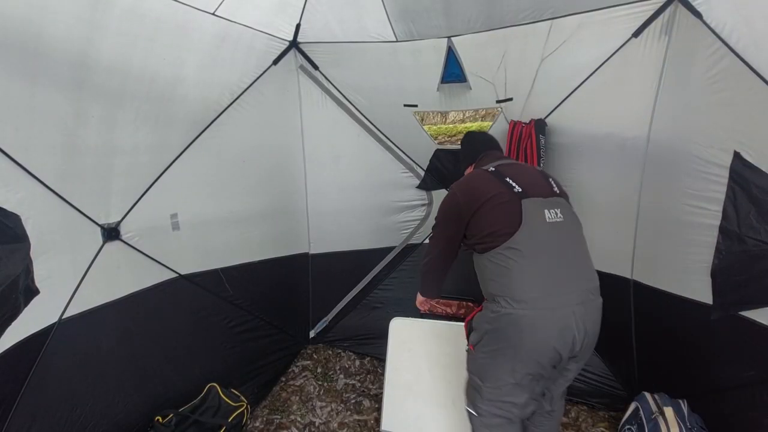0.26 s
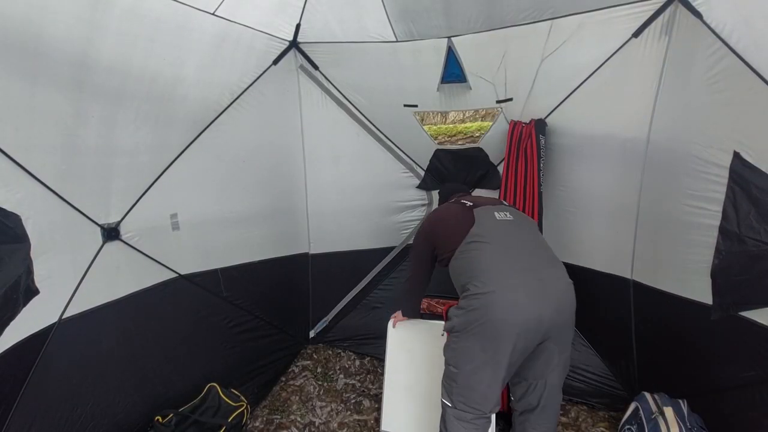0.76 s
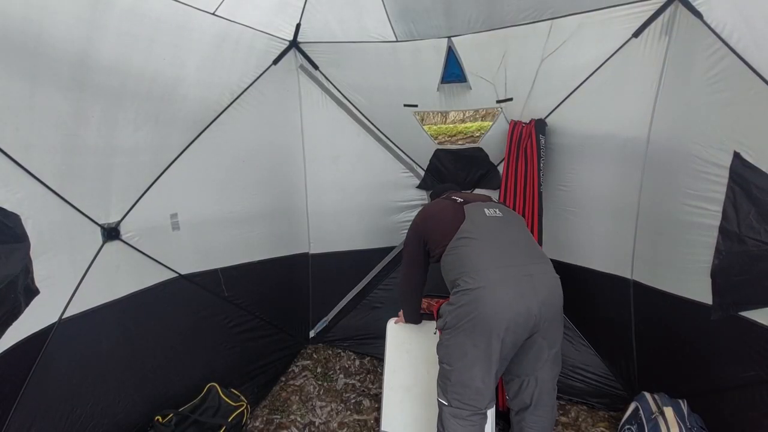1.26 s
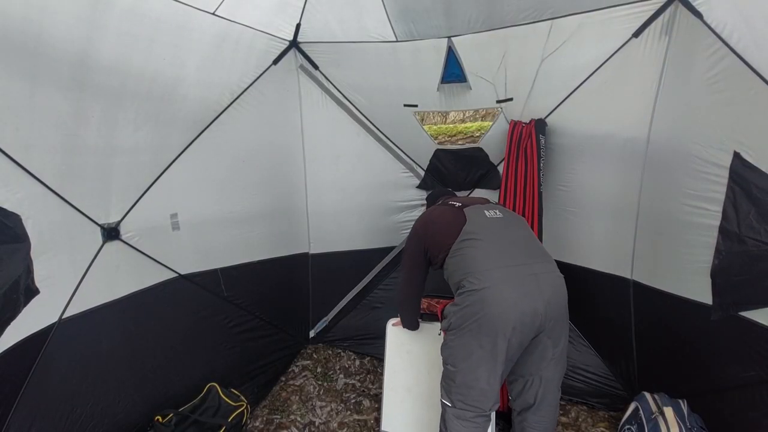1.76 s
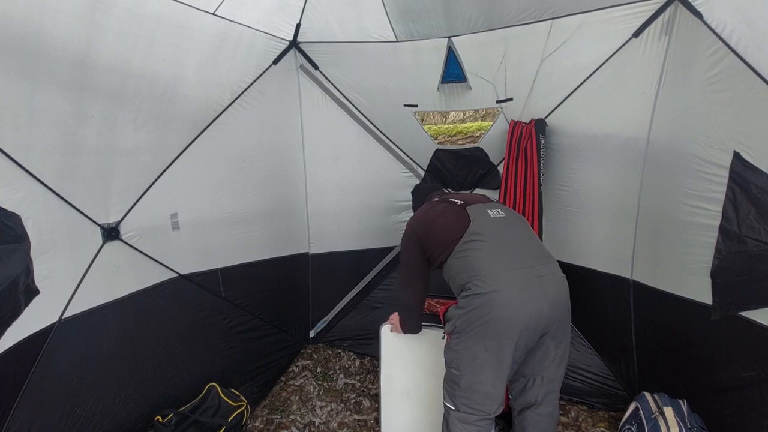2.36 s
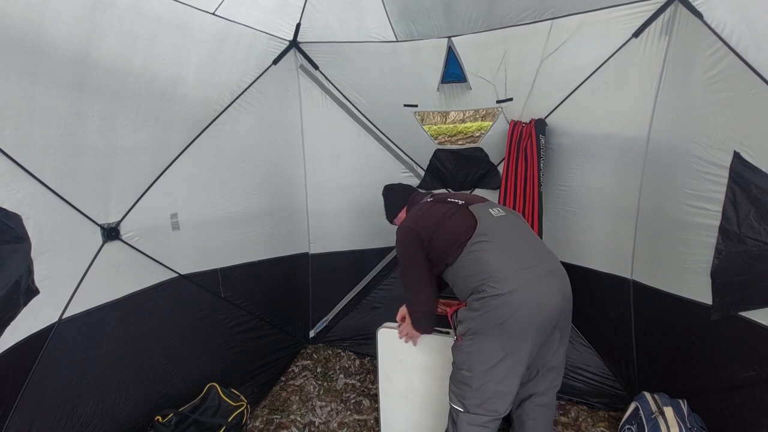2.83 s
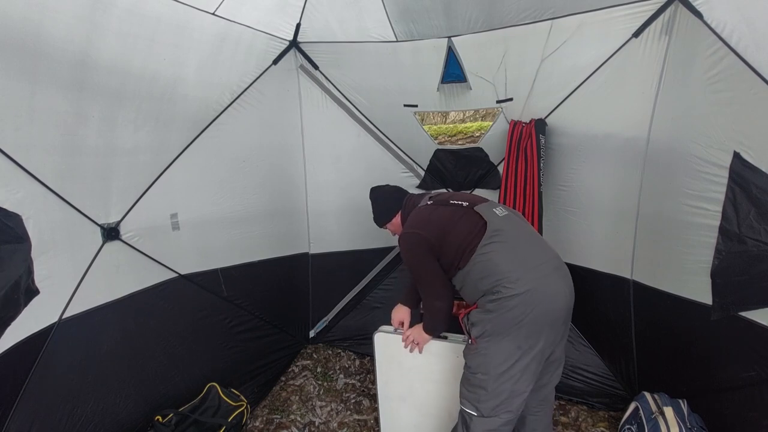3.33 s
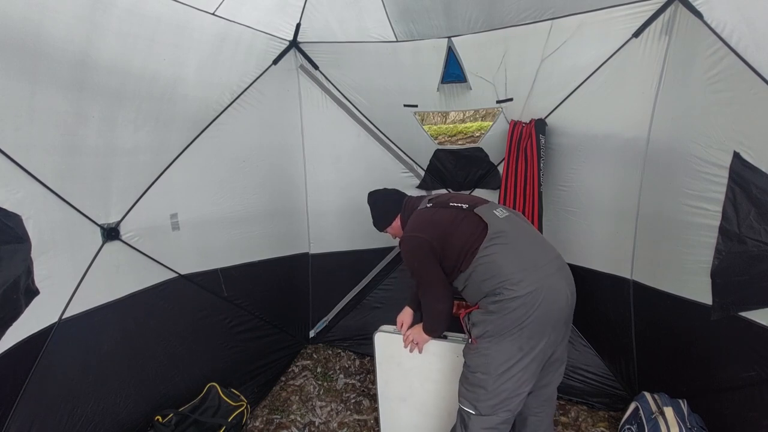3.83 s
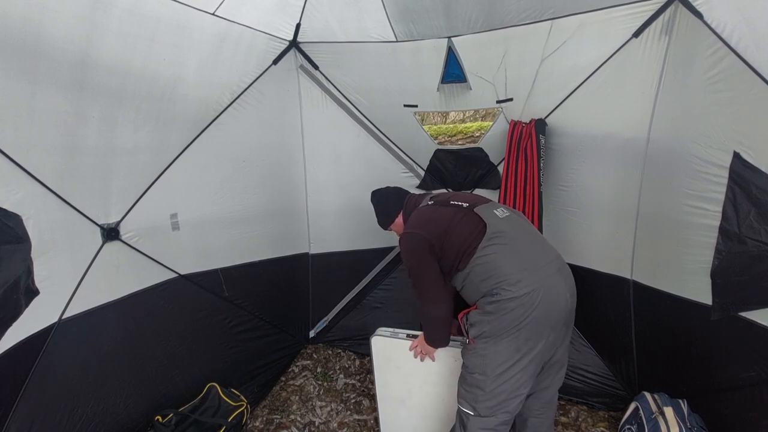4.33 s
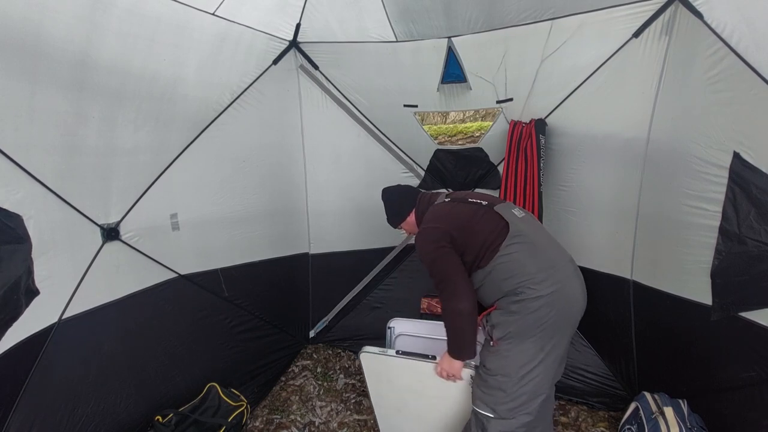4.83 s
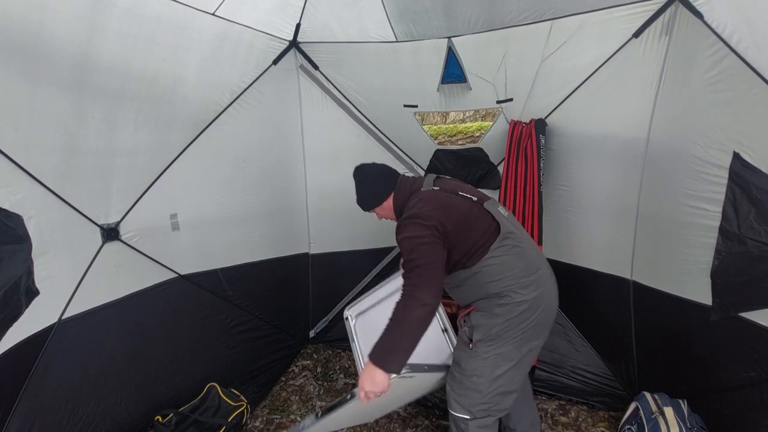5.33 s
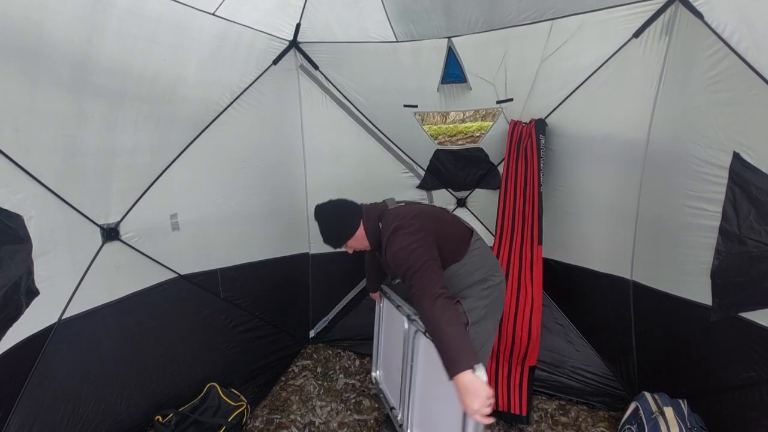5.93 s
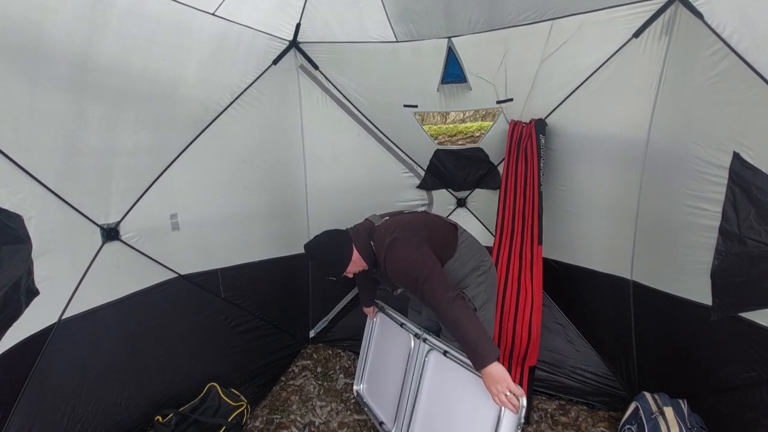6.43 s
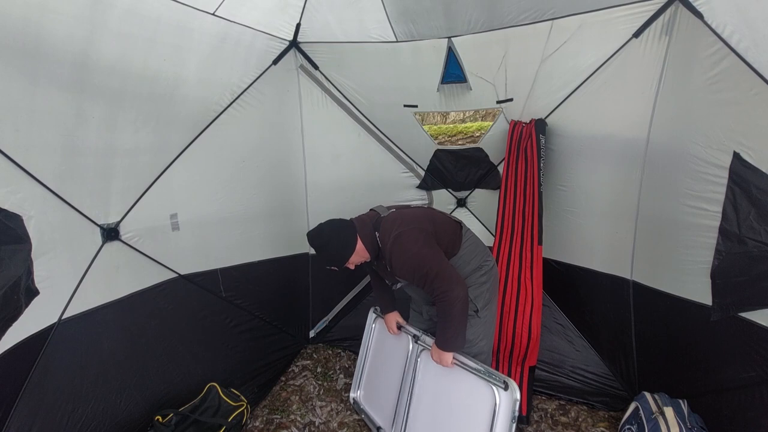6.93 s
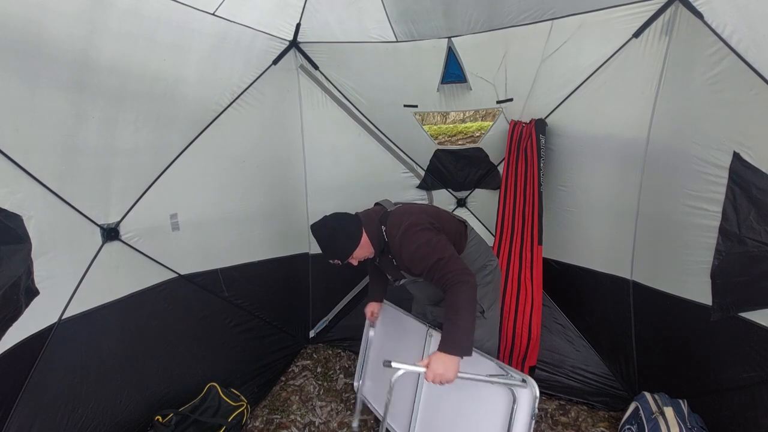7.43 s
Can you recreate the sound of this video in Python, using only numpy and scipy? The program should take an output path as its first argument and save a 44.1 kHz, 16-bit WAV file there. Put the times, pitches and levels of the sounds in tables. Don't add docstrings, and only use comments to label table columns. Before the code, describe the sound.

Stiff cloth and dry leaves rustle, then thin metal tubes clack and rattle over hollow thuds as a folding table is opened inside a tent.

```python
import sys
import numpy as np
from scipy import signal
from scipy.fft import rfft, irfft
from scipy.io import wavfile
from scipy.ndimage import uniform_filter1d

SR = 44100
rng = np.random.default_rng(int(sys.argv[2]) if len(sys.argv) > 2 else 0)


def volts_from_decibels(level):
    exponent = np.asarray(level, float) / 20
    return 10 ** exponent


def master_out(mix):
    frames = np.transpose(np.atleast_2d(mix))
    ceiling = np.clip(frames, -1, 1)
    pcm = np.round(ceiling * 32767).astype(np.int16)
    wavfile.write(sys.argv[1], SR, pcm)


N = 338688


def colour(x, table):
    hz, db = np.transpose(table)
    f = np.fft.rfftfreq(len(x), 1 / SR) + 1
    gain_db = np.interp(np.log(f), np.log(hz), db, left=-90, right=-90)
    y = irfft(rfft(x) * volts_from_decibels(gain_db), len(x))
    return y / np.sqrt(np.mean(y ** 2))


def band(x, lo_hz, hi_hz):
    sos = signal.butter(2, [lo_hz, min(hi_hz, 0.45 * SR)], "band", fs=SR, output="sos")
    return signal.sosfilt(sos, x)


def walk(rate_hz):
    hold = int(SR / rate_hz)
    steps = np.repeat(rng.standard_normal(N // hold + 1), hold)
    return 0.622 * uniform_filter1d(uniform_filter1d(steps, hold), hold)[:N]


def grit(spread_db, size=N):
    strength = np.minimum(rng.exponential(size=size), 3.5)
    return rng.standard_normal(size) * volts_from_decibels(spread_db * strength)


def decay(t, t60):
    return 1000.0 ** (-t / t60)


def seconds(length_s):
    return np.arange(int(length_s * SR)) / SR


def add(out, s, x, db):
    i = max(int(s * SR), 0)
    x = x[:N - i]
    out[i:i + len(x)] += x * volts_from_decibels(db) / np.abs(x).max()


def ring(modes, gain_db, longest_s, t):
    hz, db, t60 = np.transpose(modes)[:, :, None]
    detune, phase, uneven = rng.standard_normal((3, len(modes), 1))
    wave = np.sin(2 * np.pi * (hz * (1 + 0.03 * detune) * t + phase))
    size = volts_from_decibels(db + gain_db + 2.5 * uneven)
    damped_t60 = np.minimum(0.13 * t60, longest_s)
    return np.sum(size * wave * decay(t, damped_t60), axis=0)


# pitch_hz, level_db per Hz
AIR_SPECTRUM = [(25, 2.5), (45, -22), (58, 1), (100, -4.5), (800, -15), (1000, -46), (2000, -60),
                (4300, -42), (9000, -29.5), (12000, -33), (15800, -43)]


def air(spread_db, level_db):
    return volts_from_decibels(level_db) * colour(grit(spread_db), AIR_SPECTRUM)


def strokes(table, rest):
    s, db, rise_s, fall_s = np.transpose(table)[:, :, None]
    t = np.arange(0, N / SR + 0.001, 0.001)
    before = (s - t) / np.maximum(rise_s, 0.001)
    after = (t - s) / np.maximum(fall_s, 0.001)
    away = np.where(t < s, before, after)
    power = np.sum(volts_from_decibels(2 * (db - 10 * away)), axis=0)
    return np.sqrt(np.interp(np.arange(N) / SR, t, power) + rest ** 2)


def curves(table):
    s, *columns = np.transpose(table)
    return [volts_from_decibels(np.interp(np.arange(N) / SR, s, c)) for c in columns]


def patchy(x, table):
    x = colour(x, table)
    split_hz = table[len(table) // 2][0]
    dull = signal.sosfilt(signal.butter(1, split_hz, fs=SR, output="sos"), x)
    bright = x - dull
    return volts_from_decibels(1.5 * walk(25)) * dull + volts_from_decibels(1.5 * walk(25)) * bright


# peak_s, level_db, rise_s, fall_s
WALL_PUSHES = [(.08, -50.5, 0.33, .15), (.38, -51, 0.15, 0.18), (.66, -50, 0.091, 0.089),
               (1.47, -40.5, .03, 0.06), (3.31, -63, .06, 0.14), (3.68, -37, 0.042, 0.026),
               (4.0, -57, .04, 0.067), (4.19, -55, .05, 0.12), (5.07, -48.5, 0.22, 0.064),
               (5.56, -54.5, 0.074, 0.045), (5.97, -42.5, 0.029, 0.11), (6.2, -52, 0.18, 0.17),
               (6.4, -36.5, 0.11, 0.04), (6.99, -44.5, 0.21, 0.036), (7.51, -54, .06, 0.52)]


def wall_gain():
    return strokes(WALL_PUSHES, volts_from_decibels(-67.5))


def walls(push):
    wobble = 1 + 0.0728 * walk(10)
    drum = volts_from_decibels(-6.5) * np.sin(2 * np.pi * 54.6 * np.cumsum(wobble) / SR)
    flap = colour(grit(0.45), [(28, -41), (44, -23), (54, 5.5), (64, 3.5), (90, -5.5), (120, -2.5)])
    return push * (drum + 0.92 * flap)


def rumble(drag, push):
    gain = np.hypot(drag * volts_from_decibels(-15), push * volts_from_decibels(-7.5))
    shake = colour(grit(2.4), [(80, -38), (120, 3.5), (160, 11), (260, -1.5), (420, -5)])
    return gain * volts_from_decibels(8.4 * walk(30)) * shake


# peak_s, level_db, rise_s, fall_s
RUSTLES = [(.245, -47, 0.021, 0.046), (.31, -39.5, 0.059, 0.093), (.435, -39.5, 0.028, 0.066),
           (.596, -39.5, 0.023, 0.037), (.655, -47, 0.028, 0.028), (1.64, -56.5, 0.25, 0.096),
           (2.18, -63.5, 0.12, 0.71), (2.34, -56, 0.023, 0.11), (2.55, -61.5, 0.064, 0.039),
           (2.7, -59, 0.1, 0.1), (2.92, -57, 0.13, 0.062), (3.1, -57, .07, 0.054),
           (3.35, -59.5, 0.26, 0.39),
           (3.72, -54, .05, 0.019), (3.829, -53, 0.062, 0.046), (3.94, -50.5, 0.009, 0.044),
              (4.118, -41, 0.0053, 0.021), (4.7, -48, 0.12, 0.8), (4.974, -40, 0.036, 0.05),
              (5.012, -43, 0.069, 0.0067), (5.444, -47, 0.1, 0.28), (5.806, -42.5, 0.04, 0.076),
              (5.889, -44.5, 0.033, 0.042), (6.065, -26, 0.04, 0.063), (6.243, -34.5, 0.096, 0.042),
              (6.44, -47.5, 0.26, 0.021), (6.56, -45, 0.052, 0.11), (6.665, -42.5, 0.015, 0.046),
              (6.79, -47.5, 0.038, 0.078), (6.864, -39, .018, 0.071), (6.93, -41.5, 0.073, 0.099),
              (7.176, -42.5, 0.0052, 0.082), (7.23, -44.5, 0.0055, 0.081), (7.354, -39, 0.032, 0.11),
              (7.49, -42, 0.048, 0.096), (7.65, -51, 0.02, 0.18)]
# pitch_hz, level_db per Hz
RUSTLE_SPECTRUM = [(530, -6), (900, -2.5), (1220, -4.5), (1880, -3), (3770, 0), (5290, -4), (6500, -12),
                   (8450, -45), (14300, -120)]
# pitch_hz, level_db per Hz
CRISP_SPECTRUM = [(3530, -98), (6000, -6), (7710, 1), (8890, -2.5), (9140, -2), (14000, -19.5),
                  (15800, -28)]


def rustle(tension):
    gain = strokes(RUSTLES, tension)
    fibres = grit(3.3) * volts_from_decibels(4.1 * walk(45))
    return gain * (patchy(fibres, RUSTLE_SPECTRUM) + volts_from_decibels(-6.5) * colour(fibres, CRISP_SPECTRUM))


# peak_s, level_db, rise_s, fall_s
SCRAPES = [
    (.58, -42, 0.17, 0.042),
    (.98, -54, 0.9, 0.067),
    (5.45, -58, 0.13, 0.42),
    (6.29, -45, 0.23, 0.0083),
    (6.91, -39, 0.058, .06),
    (6.95, -45, 0.14, 0.15),
    (7.42, -51, 0.043, 0.095),
]
# pitch_hz, level_db per Hz
SCRAPE_SPECTRUM = [(150, -17), (250, 1), (452, 1), (935, -6.5), (1560, -7.5), (2200, -16.5), (2860, -52),
                   (4840, -120)]


def scraping(drag):
    return drag * volts_from_decibels(-5.5 + 5.5 * walk(45)) * patchy(grit(6.4), SCRAPE_SPECTRUM)


# time_s, weight on the dragged top level_db, cloth tension level_db
EFFORT = [(0.0, -51.5, -51.5), (0.36, -45, -68), (0.6, -59, -50.5), (0.77, -59, -57), (1.3, -47.5, -61),
          (1.7, -58.5, -68), (2.0, -59, -69.5), (2.31, -52.5, -62), (3.15, -56, -78), (3.5, -59, -79),
          (4.08, -51, -69), (4.3, -59, -59.5), (4.94, -46.5, -66), (5.2, -54.5, -57), (5.88, -52.5, -77),
          (6.15, -63, -36), (6.55, -66, -56.5), (7.68, -53, -57.5)]


def movement():
    weight, tension = curves(EFFORT)
    drag, push = strokes(SCRAPES, weight), wall_gain()
    return rustle(tension) + scraping(drag) + rumble(drag, push) + walls(push)


# start_s, level_db, pitch_hz
SNAPS = [(0.001, -26.5, 1070), (0.051, -33, 1310), (0.0928, -31.5, 860), (0.167, -26.5, 1590),
         (5.9572, -13, 3700), (6.0134, -11, 2600), (3.3073, -40.5, 4000), (4.4627, -43, 2950),
         (4.9513, -19.5, 3520), (5.402, -37, 3820), (5.5524, -36, 807), (5.67, -39, 3470),
         (6.053, -14, 3020), (7.329, -35, 3500), (7.372, -24, 2980)]


def snaps():
    out, t = np.zeros(N), seconds(0.03)
    for s, db, hz in SNAPS:
        crack = grit(3.7, len(t)) * np.exp(-t / 0.0023)
        add(out, s, band(crack, 0.3 * hz, 1.45 * hz), db - 0.5)
    return out


# start_s, level_db
SQUEAKS = [
    (6.095, -21),
    (6.113, -18),
    (6.149, -22.5),
    (6.1764, -32.5),
]


def squeaks():
    out, t = np.zeros(N), seconds(0.03)
    for s, db in SQUEAKS:
        add(out, s, np.sin(2 * np.pi * 8700 * t) * t * np.exp(-t / 0.0024), db - 6)
    return out


# start_s, level_db,
# pitch_hz, width_hz, swell_s
RINGS = [(1.305, -45.5, 4300, 200, 0.0078), (1.308, -51, 2700, 200, 0.01),
         (1.417, -26.5, 2640, 250, 0.0047), (1.416, -27, 4030, 400, 0.0081), (1.42, -29, 580, 120, 0.0034),
         (1.436, -32, 1260, 120, 0.0076), (1.42, -21, 510, 302, 0.013), (1.59, -44, 4300, 704, 0.024),
         (1.643, -56, 1050, 150, 0.0066), (3.587, -34, 1390, 2200, 0.0036), (3.596, -20, 790, 400, 0.0078),
         (3.601, -14, 5000, 3000, 0.0045), (3.6, -8.5, 2240, 2520, 0.0053), (3.655, -31, 4850, 500, 0.0056),
         (3.704, -40, 4250, 600, 0.012), (4.69, -29, 4000, 2200, 0.018), (4.964, -29, 4700, 1200, 0.0037),
         (5.003, -33.5, 2050, 400, 0.0073), (5.005, -33, 4200, 600, 0.0035), (4.928, -37, 790, 286, 0.0059),
         (4.782, -38, 680, 400, 0.0019),
         (5.953, -24, 1190, 1600, 0.0017), (5.956, -12.5, 6660, 1960, 0.0016),
              (5.971, -14, 2870, 3500, 0.0071), (6.003, -15, 2500, 1200, .006),
              (6.004, -27, 4170, 900, 0.0052), (6.046, -15, 2970, 4000, 0.004),
              (6.108, -23, 3400, 900, 0.0035), (6.32, -7, 2160, 2400, 0.0034),
              (6.335, -27, 790, 500, 0.013), (6.36, -5.5, 2320, 1010, 0.0041),
              (6.359, -12.5, 9300, 1800, 0.0023), (6.365, -14, 4000, 900, 0.0019),
              (6.53, -11.5, 3140, 3630, 0.0018), (6.529, -19, 6950, 900, 0.0013),
              (6.85, -28, 3670, 900, 0.0096), (6.852, -30, 7840, 1500, 0.0093),
              (6.896, -28, 2180, 2000, 0.0094), (6.98, -31.5, 3670, 1500, 0.0049),
              (7.174, -24, 1520, 1210, 0.0033), (7.226, -23.5, 2900, 1500, 0.0042),
              (7.228, -28.5, 5500, 1200, 0.007), (7.32, -30, 4000, 5000, 0.0096),
              (7.344, -22.5, 4500, 5000, 0.0016), (7.366, -32, 3160, 2530, 0.0087),
              (7.475, -26, 930, 500, 0.0033), (7.483, -21.5, 2470, 4000, 0.0039),
              (7.48, -40, 7700, 497, .02), (7.512, -39, 1200, 1500, 0.0023),
              (6.098, -28, 2800, 3000, 0.0025), (6.064, -24, 2500, 3500, 0.0018),
              (6.075, -27, 990, 1200, 0.0034), (6.325, -9, 1210, 506, 0.0019),
              (7.118, -26.5, 4470, 6000, 0.0018), (6.522, -26, 2710, 1500, 0.0055),
         (.3, -39.5, 647, 99, 0.0081), (0.454, -34, 1280, 150, 0.0044),
               (0.791, -40.5, 1970, 2500, 0.0066), (.8, -56, 1870, 160, 0.12), (.92, -45, 706, 200, 0.012),
               (2.285, -45, 605, 300, 0.018), (.987, -45.5, 1194, 1490, 0.0012),
               (1.15, -45, 1000, 900, 0.011), (1.265, -39, 250, 80, 0.01), (1.255, -39.5, 700, 248, 0.0077),
               (1.375, -43, 800, 700, 0.0038), (1.462, -30, 167, 70, 0.016), (1.472, -30, 320, 100, 0.019),
               (1.556, -35.5, 284, 100, 0.0098), (1.6, -42.5, 490, 500, 0.014),
               (2.131, -55, 1780, 200, 0.026), (2.546, -42.5, 1700, 2000, .001),
               (2.74, -46.5, 1660, 1200, 0.01), (2.87, -45, 487, 600, 0.011),
               (3.379, -47.5, 250, 250, 0.0036), (3.612, -19.5, 600, 905, 0.013),
               (3.675, -34.5, 650, 695, 0.017), (3.671, -34, 157, 70, 0.02), (2.353, -45, 412, 250, .012),
               (4.061, -43, 700, 923, 0.0077), (4.142, -31.5, 674, 200, 0.0061),
               (4.597, -43, 700, 794, 0.0052), (5.315, -35.5, 4200, 1200, 0.0045),
               (5.437, -50, 6800, 2520, .001), (5.452, -43, 6960, 2570, 0.0012),
               (5.683, -38, 5500, 5040, 0.004), (6.232, -32.5, 495, 700, 0.0093),
               (6.673, -43.5, 161, 80, 0.015), (6.895, -36.5, 550, 150, 0.0083),
               (6.975, -41, 500, 600, 0.011), (6.694, -40, 7500, 2500, 0.0025)]


def buzzing_parts():
    out, t = np.zeros(N), seconds(0.4)
    for s, db, hz, width_hz, swell_s in RINGS:
        push = grit(4.14, len(t)) * t * np.exp(-t / max(swell_s, 0.0005))
        centre_hz = np.hypot(hz, width_hz / 2)
        add(out, s, band(push, centre_hz - width_hz / 2, centre_hz + width_hz / 2), db)
    return out


# start_s,
# level_db, pitch_hz, cycles
BUMPS = [(0.34, -40, 53.5, 4.5), (0.63, -38, 56.5, 1.9), (5.024, -41.5, 59, 2.5), (5.55, -41, 480, 1),
         (4.415, -36, 156, 1.2), (4.867, -40, 168, 1.1), (5.136, -27, 230, 0.32), (7.035, -38, 190, 1.5),
         (1.268, -36, 260, 3.3), (1.47, -18.5, 340, 1.5), (3.595, -17, 460, 1.7), (3.71, -16, 450, 2.7),
         (7.476, -27, 260, 0.51), (6.32, -5, 2300, 1.8), (7.176, -28, 1700, 1.7)]


def bumps():
    out, t = np.zeros(N), seconds(0.4)
    for s, db, hz, cycles in BUMPS:
        add(out, s, np.sin(2 * np.pi * hz * t) * t * np.exp(-2 * t * hz / cycles), db)
    return out


# pitch_hz, level_db, t60_s
TOP = [(164.7, -2, 0.77), (284, -7, 1), (317, -24, 0.39), (440, 0, 0.13), (533, 4.5, 0.11),
       (686, -6.5, 0.3), (964, -37, 0.38), (1050, -4, 0.2), (1208, -13, 0.47)]
# start_s, level_db, pitch_hz,
# t60_s
THUDS = [(0.319, -31, 785, 0.14), (0.455, -34, 1360, 0.047), (0.712, -39, 250, 0.24),
         (1.258, -34.5, 1180, 0.083), (1.29, -35, 280, 0.051), (1.33, -36, 641, 0.046),
         (1.415, -23.5, 300, 0.31), (1.44, -27, 426, 0.23), (1.559, -35.5, 258, 0.52),
         (2.123, -39, 142, 0.06), (2.326, -33, 317, 0.21), (3.074, -42, 290, 0.14),
         (3.292, -33, 177, 0.051),
         (3.594, -12, 600, 0.081), (3.689, -31, 463, 0.19), (7.45, -30.5, 300, 0.081),
              (4.021, -39.5, 1120, 0.067), (4.146, -28.5, 544, 0.057), (4.409, -35, 149, 0.13),
              (4.784, -32, 143, 0.14), (4.862, -31, 148, 0.034), (4.937, -33, 524, 0.18),
              (5.547, -40, 384, 0.027), (5.954, -21.5, 700, 0.45), (6.03, -20, 292, 0.32),
              (6.321, -16, 1170, 0.083), (6.387, -32.5, 133, 0.55), (6.668, -31, 463, 0.11),
              (7.044, -28.5, 164, 0.089), (7.189, -32.5, 336, 0.17), (7.472, -22.5, 309, 0.17),
              (3.6, -23.5, 144, 0.16), (5.135, -31.5, 191, 0.018), (5.957, -21.5, 128, 0.54),
              (6.32, -15.5, 250, 0.072)]


def thuds():
    out, t = np.zeros(N), seconds(0.4)
    top_hz = np.array(TOP)[:, :1]
    for s, db, hz, t60 in THUDS:
        push = grit(3, len(t)) * decay(t, max(t60, 0.02)) * np.minimum(t / 0.005, 1)
        near_db = -7 * np.abs(np.log2(top_hz / hz))
        body = signal.fftconvolve(push, ring(TOP, near_db, 0.089, t))[:len(t)]
        add(out, s, body, db - 7)
        add(out, s, band(push, 0.8 * hz, 1.25 * hz), db - 7)
        add(out, s, band(push, 0.5 * hz, 4.5 * hz), db - 6)
    return out


def rattle(db, t60, t):
    hard = np.clip((db + 30.5) / 18, 0, 1)
    blow = np.minimum(0.6 * hard + 0.3 + t / 0.006, 1) + 1.2 * hard * np.exp(-t / 0.0012)
    bounces = volts_from_decibels(1.5 * np.repeat(rng.standard_normal(len(t) // 128 + 1), 128)[:len(t)])
    after_hold = np.maximum(t - 0.003 - 0.0086 * hard, 0)
    return blow * bounces * grit(2.83, len(t)) * decay(after_hold, max(t60, 0.01))


# pitch_hz, level_db, t60_s
TUBES = [(3260, -29, 0.1), (3440, -19.0, 0.18), (4200, 12, 0.068), (5500, -25.0, 0.092), (8000, 14, 0.21),
         (9360, 5.0, 0.2), (1530, 11.0, 0.18), (2130, -33, 0.06), (2880, 4, 0.08), (2990, 14, 0.19),
         (3510, 6.5, 0.033), (4580, 0.0, 0.049), (8270, 14.5, 0.081), (9600, -24, 0.13)]
# start_s, level_db, hollow top level_db, rattle t60_s, pitch_hz
CLACKS_TIGHT = [(1.3109, -47, 4, 0.2, 3900), (1.42, -21.5, -1, 0.19, 2340), (1.6053, -43, -3, 0.34, 4050),
                (2.7692, -49.5, 2, 0.37, 1790), (3.711, -44, -37, 0.11, 4200),
                (3.8425, -23, -16, 0.12, 5500), (3.951, -33, -11.5, 0.11, 4830),
                (4.1196, -27, -13, 0.23, 6050), (4.9633, -26, -10, 0.1, 4840), (5.007, -46, 5, 0.039, 4050),
                (5.9564, -9.5, -10.5, 0.24, 3700), (6.0027, -11, -7.5, 0.36, 2420),
                (6.9187, -24, -14, 0.089, 3980), (7.1744, -27.5, -8, 0.042, 1410)]
# start_s, level_db, hollow top level_db, rattle t60_s, pitch_hz
CLACKS_RIVET = [(0.595, -31, -6, 0.06, 2520), (2.336, -43.5, 0.5, 0.035, 1410),
                (3.598, -5.5, -6.5, 0.17, 4000), (4.5415, -40.5, -7, 0.03, 4140),
                (4.692, -25, -22, 0.5, 4300), (5.316, -32, -18, 0.084, 5500), (6.32, -8, -14, 0.2, 2340),
                (6.359, -7, -21.5, 0.15, 2560), (6.5297, -13.5, -26, .13, 3600),
                (6.6575, -27, -22, 0.091, 3510), (6.783, -33, -7, 0.34, 2920),
                (6.8528, -25, -34, 0.045, 3720), (7.226, -23, -20, 0.04, 3160)]
# start_s, level_db, hollow top level_db, rattle t60_s, pitch_hz
CLACKS_LOOSE = [
    (3.541, -30, -23, 0.12, 1950),
    (5.201, -38, -32.5, 0.057, 3100),
    (5.6704, -36, -12, 0.25, 3530),
    (5.77, -31.5, -11.5, 0.12, 3060),
    (6.0506, -20, -4.5, 0.18, 2260),
    (6.982, -22.5, -12, .05, 1930),
    (7.031, -30.5, -2, 0.16, 2060),
    (7.12, -33.5, -34, 0.12, 2900),
    (7.3446, -21.5, -20, 0.11, 2400),
    (7.482, -22, -17, 0.26, 4000),
]


def clacks():
    out, t = np.zeros(N), seconds(0.4)
    tube_hz = np.array(TUBES)[:, :1]
    joints = [(CLACKS_TIGHT, -75), (CLACKS_RIVET, -6), (CLACKS_LOOSE, 7)]
    for rows, sizzle_db in joints:
        for s, db, top_db, t60, hz in rows:
            chatter = rattle(db, t60, t)
            near_db = -6 * np.abs(np.log2(tube_hz / hz))
            tubes = signal.fftconvolve(chatter, ring(TUBES, near_db, 0.022, t))[:len(t)]
            add(out, s, tubes, db - 11)
            add(out, s, band(chatter, 0.88 * hz, 1.14 * hz), db - 12)
            add(out, s, band(chatter, 0.43 * hz, 2.35 * hz), db - 3)
            brighter = np.log2(hz / 3300)
            sizzle = band(band(chatter, 4500, 10000), 5100, 13200)
            add(out, s, sizzle, db + sizzle_db - 10 + 1.6 * brighter)
            fizz = band(band(chatter, 10600, 17000), 11000, 23000)
            add(out, s + 0.0013, fizz, db + 0.7 * sizzle_db - 13 + 11 * brighter)
            top = signal.fftconvolve(band(chatter, 185, 2600), ring(TOP, 0, 0.046, t))[:len(t)]
            add(out, s - 0.003, top, db + top_db + 2.5)
    return out


def tent(x):
    t = seconds(0.3)
    cloud = band(rng.standard_normal(len(t)), 120, 12800)
    echoes = cloud * decay(t, 0.1) * np.minimum(t / 0.0051, 1)
    wet = signal.fftconvolve(x, echoes / np.linalg.norm(echoes))[:N]
    return band(x + volts_from_decibels(-12) * wet, 29, 9650)


def scene():
    table = tent(clacks() + thuds() + snaps() + squeaks()) + tent(buzzing_parts() + bumps())
    mono = air(0.54, -62) + movement() + table
    return mono + np.array([air(0.6, -71.5) for _ in range(2)])


def smooth(x, time_s):
    keep = np.exp(-1 / (time_s * SR))
    return signal.lfilter([1 - keep], [1, -keep], x)


# band top pitch_hz, full duck below level_db, none above level_db, depth_db
DUCK = [(320, -73.5, -45, 18), (605, -73.5, -54, 9.5), (1410, -73.5, -59.5, 15), (4000, -69.5, -57, 14.5),
        (9300, -73, -59, 6), (19500, -79, -56, 12)]


def ducked_right(dry):
    f, (left, other) = np.fft.rfftfreq(N, 1 / SR), rfft(dry)
    right, below = np.zeros(N), np.zeros(len(f))
    for top_hz, quiet_db, loud_db, depth_db in DUCK:
        under = 1 / (1 + (f / top_hz) ** 8)
        part, own = irfft([left, other - left] * (under - below), N)
        power = part ** 2 + volts_from_decibels(-79) * dry[0] ** 2
        db = 10 * np.log10(smooth(power, 0.011) + 1e-18)
        shut = smooth(np.clip((loud_db - db) / (loud_db - quiet_db), 0, 1), 0.01)
        right += part * volts_from_decibels(-depth_db * shut) + shut * own
        below = under
    treble = band(band(right, 13100, 15000), 13100, 15000)
    return right + 1.6 * walk(1500) * treble


def band_limit(x):
    return signal.sosfilt(signal.butter(12, 15830, fs=SR, output="sos"), x)


def record(dry):
    dry = dry + volts_from_decibels(-17) * band(dry, 4310 - 650, 4310 + 650)
    ceiling = 1.6
    mix = ceiling * np.tanh(np.array([dry[0], ducked_right(dry)]) / ceiling)
    return band_limit(mix)


dry = scene()
out = record(dry)
master_out(out)
```